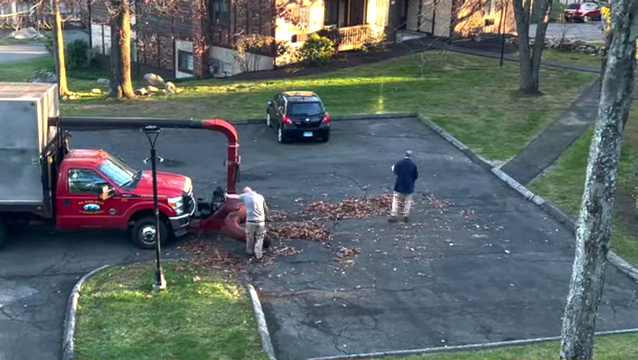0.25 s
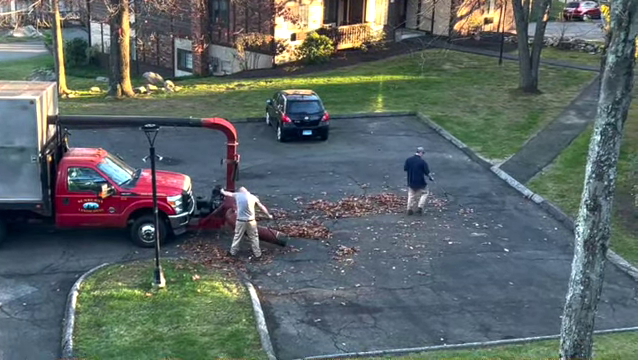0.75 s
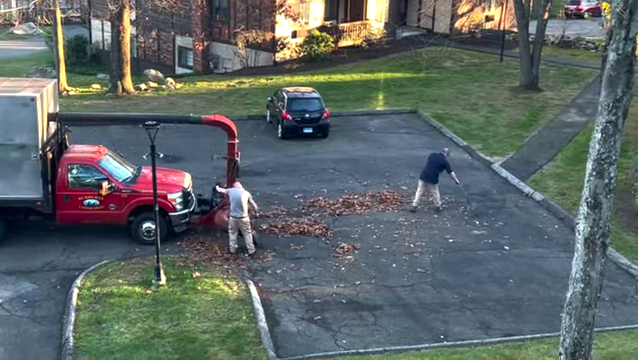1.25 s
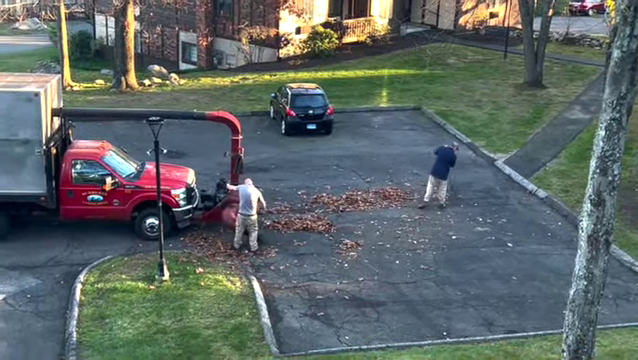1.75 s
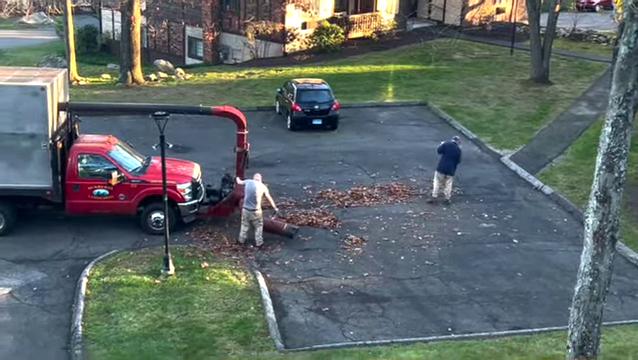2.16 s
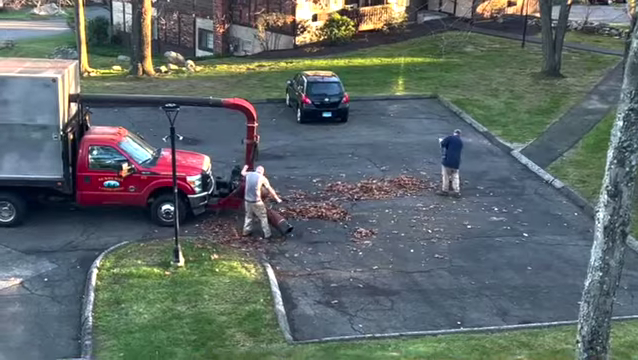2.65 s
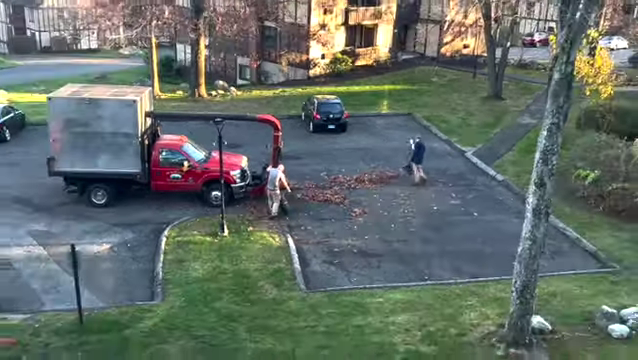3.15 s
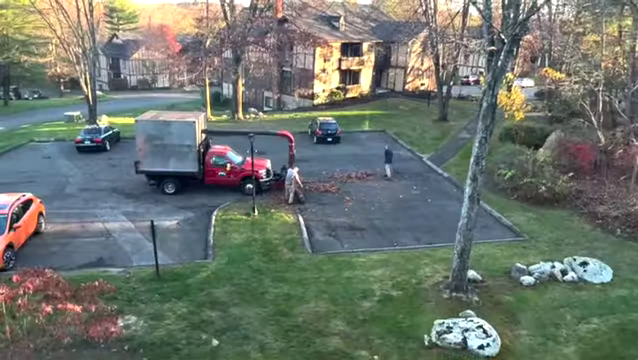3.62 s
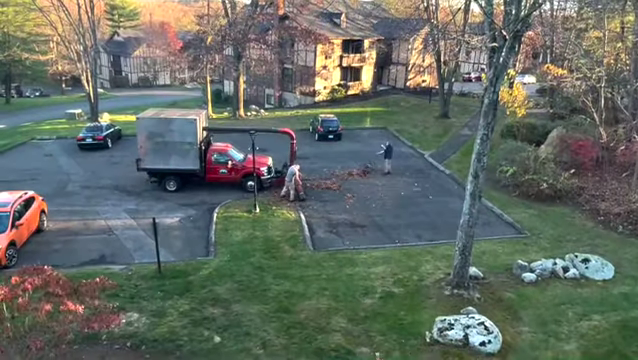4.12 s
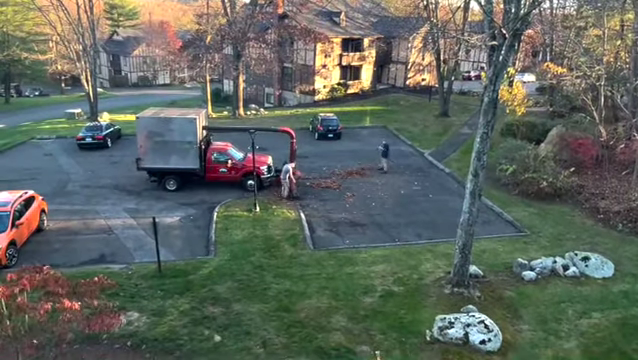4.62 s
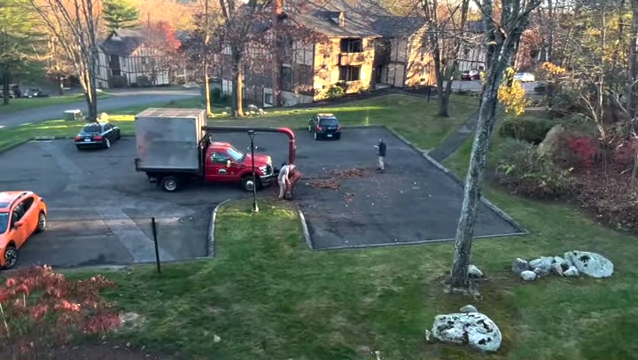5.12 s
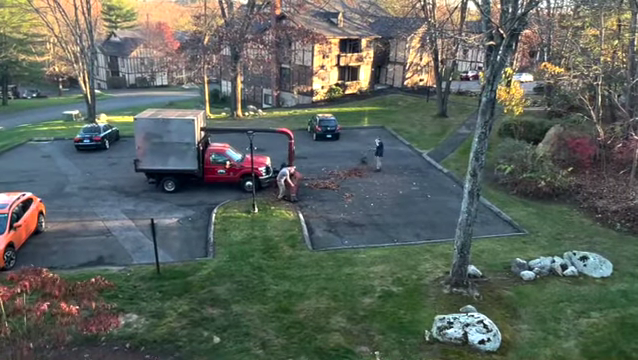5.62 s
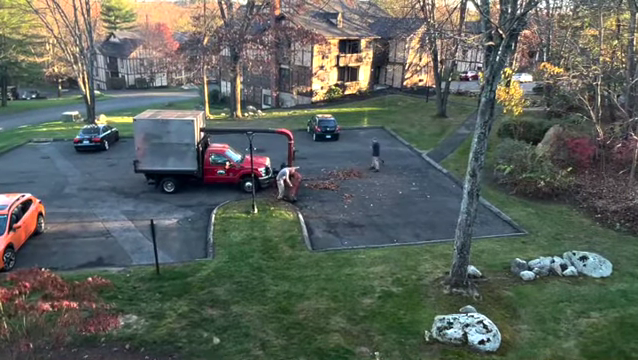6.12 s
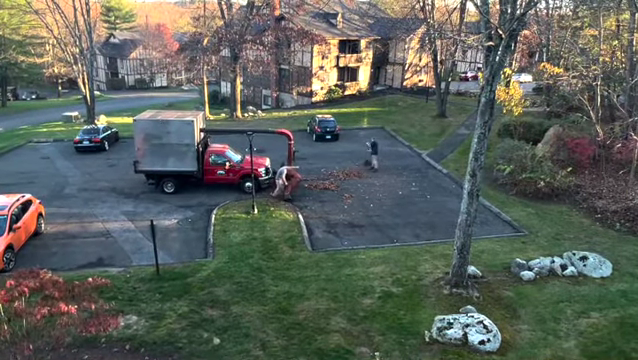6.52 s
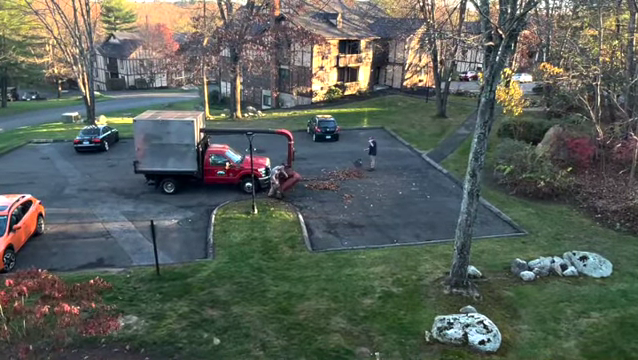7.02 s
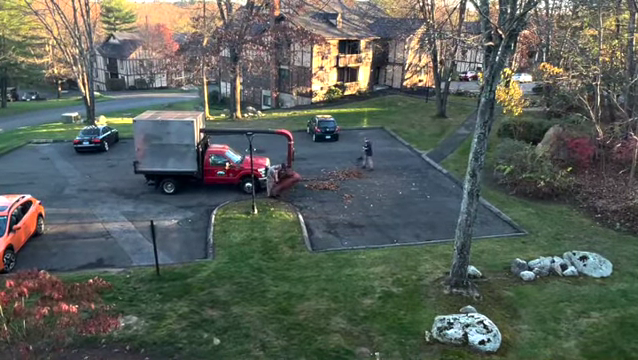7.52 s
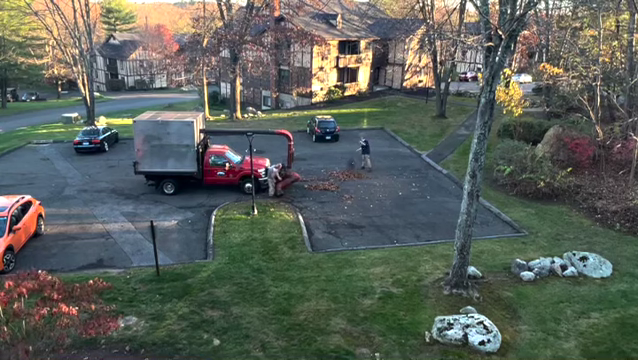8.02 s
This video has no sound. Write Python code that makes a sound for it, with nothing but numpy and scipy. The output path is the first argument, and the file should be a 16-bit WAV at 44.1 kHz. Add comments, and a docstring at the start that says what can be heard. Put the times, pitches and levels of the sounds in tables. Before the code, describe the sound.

A truck-mounted leaf vacuum drones steadily outdoors, its throbbing engine and humming fan under rushing air and the surging hiss of dry leaves.

```python
"""An engine throbs under a fan's hum, a roar of air and a hiss of leaves: a truck-mounted leaf vacuum
working across a car park, heard from an upper floor. Its governed twin-cylinder engine puffs through a
muffler, knocks, rings its covers and turns a four-blade fan. Air resonates in the hose; loads of leaves
tick through it and clumps scrape the housing. The microphone is zoomed in and nearly mono at first,
then opens to wide stereo at about 3.4 s; a few soft booms follow."""
import sys
import numpy as np
from scipy import signal
from scipy.fft import rfft, irfft
from scipy.io import wavfile
from scipy.ndimage import uniform_filter1d, map_coordinates

SR = 44100
rng = np.random.default_rng(int(sys.argv[2]) if len(sys.argv) > 2 else 0)


def wav_out(sig):
    """Save sig, one row per channel (or a flat mono array), as 16-bit PCM at SR to the path in sys.argv[1]."""
    wavfile.write(sys.argv[1], SR, np.round(np.clip(np.atleast_2d(sig).T, -1, 1) * 32767).astype(np.int16))


N = 364707
T = np.arange(N) / SR
HZ = np.maximum(np.arange(N // 2 + 1) * SR / N, 1)
SIDES = np.array([[.5], [-.5]])  # left and right shares of a difference


def undb(db):
    """Decibels to gain."""
    return 10 ** (np.asarray(db) / 20)


def unit(x):
    """Scale to rms 1."""
    return x / np.sqrt(np.mean(x ** 2))


def curve(table):
    """A (time, value) table, sample by sample."""
    return np.interp(T, *np.transpose(table))


def colour(points):
    """Gain per frequency from (Hz, dB) points."""
    hz, db = np.transpose(points)
    return undb(np.interp(np.log(HZ), np.log(hz), db))


def resonances(modes):
    """Gain per frequency of (Hz, width Hz, dB) resonances."""
    return np.sqrt(sum(undb(db) ** 2 / (1 + ((HZ ** 2 - hz ** 2) / (HZ * width_hz)) ** 2)
                       for hz, width_hz, db in modes))


def filtered(x, gain):
    """Apply a gain per frequency."""
    return irfft(rfft(x) * gain, N)


def walk(rate_hz):
    """Smooth, bounded random drift with spread near 1."""
    points = rng.uniform(-2.3, 2.07, size=2048)
    return map_coordinates(points, [T * rate_hz], order=2, mode="wrap")


def hump(at_s, half_s, shape=2, tail=1):
    """A rise to 1 at at_s and a fall tail times as long; shape 1 is pointed, 2 round."""
    return np.exp(-np.abs((T - at_s) / np.where(T < at_s, half_s, half_s * tail)) ** shape)


# cylinder firings: (moment [cycles], strength [ratio])
FIRINGS = [(.104, 0.77), (.712, 0.73)]
# muffler chambers: (centre [Hz], width [Hz])
MUFFLER_MODES = [(56.8, 28.5), (137.5, 8.2), (273, 68)]
# exhaust harmonics: (order [per cycle], relative level [dB])
EXHAUST_LINES = [(2, -38), (3, -31.5), (4, -44.5), (5, -24), (6, -36.5), (7, -27), (9, -34), (10, -29.5),
                 (11, -45), (13, -38.5), (14, -40), (15, -41)]


def exhaust(cycle, openness, stray_db=0.93, gain_db=-0.6, pan_db=-1.2, zoom_tilt_db=1.6):
    """Two unevenly spaced firings a cycle ring the muffler: a throb, brighter while zoomed in."""
    out = 0
    stumble = (.001 + .0008 * openness) * walk(24)  # no firing comes exactly on time
    force = undb(0.65 * walk(40))
    for order, db in EXHAUST_LINES:
        k = round(order)
        hz = k * cycle[-1] / T[-1]
        pair = sum(strength * np.exp(-2j * np.pi * k * at) for at, strength in FIRINGS)
        lag_rad = 2 * sum(np.arctan2(hz * width_hz, centre_hz ** 2 - hz ** 2)
                          for centre_hz, width_hz in MUFFLER_MODES)
        phase = 2 * np.pi * k * (cycle + stumble) + np.angle(pair) - lag_rad
        db = db + zoom_tilt_db * (.5 - openness) / (1 + (200 / hz) ** 8)
        db = db + stray_db * k / 10 * walk(5)  # moving air disturbs high lines most
        out = out - undb(db) * np.cos(phase)
    return np.sqrt(2) * force * out * undb(gain_db + SIDES * pan_db)


# modes rung by the knock: (centre [Hz], width [Hz], relative level [dB])
KNOCK_MODES = [(503, 32, -13), (623, 47, 8.5), (691, 84, 7), (827, 180, -15.5)]


def knock(cycle, at_cycles=0.017, low_cut_hz=350, level_db=-40.8):
    """Once a cycle the engine gives a hard, hollow knock that rings down."""
    since_s = (cycle - at_cycles) % 1 * T[-1] / cycle[-1]
    ring = sum(undb(db) * np.exp(-np.pi * width_hz * since_s) * np.sin(2 * np.pi * hz * since_s)
               for hz, width_hz, db in KNOCK_MODES)
    strength = undb(2.6 * walk(24))
    radiated = filtered(ring * strength, 1 / (1 + (low_cut_hz / HZ) ** 2))  # small panels shed no bass
    return unit(radiated) * undb(level_db)


# cover harmonics: (order [per cycle], relative level zoomed [dB], relative level wide [dB])
COVER_LINES = [(18, -45, -53), (21, -49.5, -50), (30, -58, -49), (34, -47.5, -51), (35, -53, -54),
               (36, -49, -52), (48, -53.5, -56), (49, -58, -56), (51, -55, -57), (55, -58, -60),
               (63, -50.5, -58), (64, -54, -58), (66, -57, -61), (84, -53, -57)]


def covers(cycle, openness, waver_rad_per_khz=0.47, patchy_db=3.0, gain_db=-1):
    """Engine covers resonate in thin, wavering lines; each side hears them by its own path."""
    out = np.zeros((2, N))
    for order, zoomed_db, wide_db in COVER_LINES:
        db = zoomed_db + (wide_db - zoomed_db) * openness
        gain = undb(db + gain_db + patchy_db * walk(11))
        phase = 2 * np.pi * round(order) * cycle
        khz = order * cycle[-1] / T[-1] / 1000
        path_drift = walk(20) + .5 * np.array([walk(11), walk(9)])
        out += gain * np.cos(phase + waver_rad_per_khz * khz * path_drift)
    return np.sqrt(2) * out


# turbulent exhaust gas: (frequency [Hz], relative density [dB])
GAS_SPECTRUM = [(40, -18.5), (80, -7), (112, 0), (130, -6.5), (155, -1.5), (180, -2), (205, 4), (228, -5.5),
                (255, -6), (335, -1.5), (395, -7.5), (425, -13), (520, -22.5), (900, -24), (1500, -58.5)]
# low rumble: (frequency [Hz], relative density [dB])
RUMBLE_SPECTRUM = [(20, -24), (32, -25.5), (55, 8), (85, 9.5), (115, 3.5), (150, -8.5), (300, -34.5)]


def gas(cycle, decay_cycles=0.3, steady_flow=1.2, puff_db=-27, rumble_db=-34.5):
    """Each firing blows a turbulent puff out of the muffler, over a steady low rumble."""
    flow = steady_flow + sum(strength * np.exp(-((cycle - at) % 1) / decay_cycles)
                             for at, strength in FIRINGS)
    rumble = unit(filtered(rng.standard_normal(N), colour(RUMBLE_SPECTRUM)))
    puffs = unit(filtered(flow * rng.standard_normal(N), colour(GAS_SPECTRUM)))
    return undb(puff_db) * puffs + undb(rumble_db) * rumble


# blade harmonics 1-4: (relative level [dB])
BLADE_DB = [-26, -28.5, -43, -38.5]
# their places in wide stereo: (left minus right [dB], left lead [rad])
BLADE_PLACES = [(-8, -1.17), (3, -0.42), (-5.5, -0.17), (-1, 0.94)]
# swells and fades as the hose is swung: (time [s], harmonic [number], change [dB], half length [s])
BLADE_SWELLS = [(0.0, 1, -18, 0.29), (0.556, 1, 3, 0.094), (0.88, 1, 10, 0.39), (2.41, 1, 10.7, 0.42),
                (2.98, 1, 4, 0.2), (3.652, 1, 3.5, 0.22), (8.15, 1, 3.5, .2), (0.285, 2, -14.5, 0.17),
                (0.684, 2, -12, 0.093), (0.994, 2, -6, 0.061), (1.466, 2, -1.5, .15), (2.198, 2, 5, 0.64),
                (3.59, 2, -9.5, 0.13), (4, 2, 2.5, 0.21), (4.79, 2, -4.5, 0.12), (6.375, 2, -3, .17),
                (7.34, 2, -13, 0.1), (0.42, 3, 2, 0.11), (1.152, 3, 3.5, .25), (2.123, 3, 6, 0.1),
                (2.55, 3, 3, 0.3), (3.298, 3, 9, 0.16), (3.85, 3, 6.5, 0.071), (4.831, 3, 12, 0.05),
                (5.5, 3, -19, 0.35), (7.05, 3, 12, 0.12), (7.293, 3, 8, 0.08), (7.648, 3, -12, 0.25),
                (0.448, 4, 5, 0.25), (1.576, 4, -14, 0.15), (2.08, 4, 6.5, 0.13), (2.72, 4, 5.5, 0.14),
                (3.2, 4, -11, 0.26), (3.693, 4, 4.5, 0.21), (4.417, 4, -5, 0.2), (4.98, 4, 6.5, 0.06),
                (5.743, 4, -6, 0.48), (6.476, 4, 6.5, 0.05), (7.526, 4, 3, 0.17)]


def fan(cycle, openness, lag_cycles=0.1156, zoomed_width=0.31, waver_rad=0.09, flutter_db=0.42):
    """Four blades pass the outlet twice a cycle; uneven inflow makes the overtones flutter."""
    out = 0
    width = zoomed_width + (1 - zoomed_width) * openness
    for k, (db, (pan_db, lead_rad)) in enumerate(zip(BLADE_DB, BLADE_PLACES), 1):
        db = db + sum(change_db * hump(at_s, half_s)
                      for at_s, harmonic, change_db, half_s in BLADE_SWELLS if round(harmonic) == k)
        db = db + k * flutter_db * walk(16) + SIDES * width * pan_db
        phase = 2 * np.pi * k * 8 * (cycle - lag_cycles)
        phase = phase + k * waver_rad * walk(16) + SIDES * width * lead_rad
        out = out - undb(db - 1) * np.cos(phase)  # each blade leaves a dip in pressure
    return np.sqrt(2) * out


# hose and housing resonances, before sharpening: (centre [Hz], width [Hz], relative level [dB])
HOSE_MODES = [(452, 73, -4), (592.5, 71, -0.5), (737, 58, -2), (875, 44, -3)]
# hollow roar: (time [s], level [dB])
ROAR_LEVELS = [(0, -34), (.35, -34), (.85, -34.5), (1.6, -38.5), (2.2, -35), (2.9, -38), (3.8, -35.5),
               (4.8, -33.5), (5.5, -38), (6.28, -32.5), (6.52, -33), (6.72, -42.5), (7.07, -33),
               (7.4, -39.5), (8.27, -37.5)]


def hose(cycle, chop=0.23, sharpen=1.7, flex=.012, swell_db=0.36):
    """Air chopped by the blades roars in the hose, whose resonances shift as it flexes."""
    chopped = (1 + chop * np.cos(2 * np.pi * 8 * cycle)) * rng.standard_normal(N)
    roar = filtered(chopped, resonances(HOSE_MODES) ** sharpen)
    flexed = map_coordinates(roar, [np.cumsum(1 + flex * walk(3))], order=1, mode="mirror")
    return unit(flexed) * undb(curve(ROAR_LEVELS) + swell_db * walk(4.6))


# air leaving the chute: (frequency [Hz], relative density [dB])
RUSH_SPECTRUM = [(200, -4.5), (520, -3), (680, 5), (900, 6.5), (1050, 0), (1180, 4.5), (1260, 0),
                 (1500, 3.5), (1750, -3), (2150, 0.5), (2900, -20), (4500, -15), (9000, -55.5)]


def chute(rise_db, openness, base_db=-38, follow=0.41, wide_db=1.16):
    """Air rushes out of the chute, louder with each load of leaves."""
    rush = unit(filtered(rng.standard_normal(N), colour(RUSH_SPECTRUM)))
    return rush * undb(base_db + follow * rise_db + wide_db * openness)


# loads of leaves: (time [s], hiss rise [dB], half length [s], added brightness [dB])
LEAF_LOADS = [(0.054, 6.5, 0.15, 4), (0.5, 2, 0.032, -3), (0.642, 3.5, 0.41, 1.5), (0.8, 2.5, .04, -1),
              (1.015, 4.5, 0.031, -2.5), (1.13, 1, .035, 3), (1.322, 3, .08, 5), (1.607, 6.5, 0.2, 1),
              (1.892, 2.5, .04, 9), (2.825, 4.8, 0.2, 2.5), (3.06, 4.5, 0.052, 3.5), (3.218, 5.5, 0.036, 4),
              (3.63, 1.5, .03, -4), (4.02, 6, 0.2, 7), (4.786, 3.5, .04, 2), (5.044, 4.5, 0.17, 0.5),
              (5.336, 8.5, 0.14, -0.5), (5.852, 6.5, 0.21, -5), (6.052, 5.5, 0.027, -5.5),
              (6.42, 2.5, .1, 0), (6.535, 3, .015, -2.5), (6.808, 8, 0.23, -1.5), (7.152, 4, 0.46, 2),
              (7.972, 8.2, 0.2, 2), (8.246, 5, 0.036, -1)]


def feed(cycle, base_bright_db=-1.5, throb_db=0.5):
    """Loads sucked up the hose lift and colour the hiss; it flickers with clumps and each fan turn."""
    rise_db, bright_db = 0, base_bright_db
    for at_s, db, half_s, added_db in LEAF_LOADS:
        passing = hump(at_s, half_s, shape=1.15, tail=0.67)
        rise_db = rise_db + db * passing
        bright_db = bright_db + added_db * passing
    clumps_db = walk(45)
    clumps_db = clumps_db - uniform_filter1d(clumps_db, size=SR // 14)  # only the quick changes
    flicker_db = clumps_db + throb_db * np.cos(2 * np.pi * 2 * cycle)
    return rise_db, flicker_db, bright_db


# dry leaves in fan and duct: (frequency [Hz], relative density [dB])
LEAF_SPECTRUM = [(800, -10.5), (1800, -0.5), (2700, 2), (3600, -0.5), (4500, 0.5), (5200, -1.5),
                 (5700, -1.5), (6600, -5), (7200, -7.5), (8900, -8.5), (9600, -20)]


def leaves(lift_db, bright_db, ticks_per_s=3000, scatter_db=3.5, noise_ratio=1.8, base_db=-42):
    """Dry leaves tick against impeller and duct, so densely that they merge into a hiss."""
    tilt_db = bright_db + 2.0 * walk(20)
    hits = rng.random(N) < ticks_per_s / SR
    size_db = scatter_db * np.minimum(rng.exponential(size=N), np.pi)
    ticks = hits * rng.uniform(-1.27, 1, N) * undb(size_db)
    hiss = unit(filtered(unit(ticks) + noise_ratio * rng.standard_normal(N), colour(LEAF_SPECTRUM)))
    crisp = filtered(hiss, 1 / (1 + (5200 / HZ) ** 6))  # small dry scraps make the top octave
    tilted = (hiss - crisp) * undb(-.25 * tilt_db) + crisp * undb(.5 * tilt_db)
    return tilted * undb(base_db + lift_db)


# scraping clumps: (time [s], level [dB], half length [s], centre [Hz])
RASPS = [(1.58, -46, .08, 2050), (5.07, -44, 0.16, 2130), (6.6, -44.5, 0.13, 2050),
         (6.973, -37, 0.082, 2090), (8.224, -44, .05, 2150)]


def rasps(cycle, width_hz=420, sharpen=1.4, chop=0.38, grit_db=3.5):
    """Clumps of leaves scrape round the fan housing, once a turn, and make it ring."""
    scrape = (1 + chop * np.cos(2 * np.pi * 2 * cycle)) * undb(grit_db * walk(70))
    out = 0
    for at_s, db, half_s, hz in RASPS:
        ring = filtered(scrape * rng.standard_normal(N), resonances([(hz, width_hz, 0)]) ** sharpen)
        out = out + unit(ring) * undb(db) * hump(at_s, half_s)
    return out


# low booms: (time [s], level [dB], half length [s], centre [Hz])
BOOMS = [(3.927, -29, 0.12, 66.6), (4.375, -28.5, 0.21, 87), (4.745, -25.5, 0.11, 106),
         (6.78, -31, 0.15, 114)]


def booms(width_hz=48, sharpen=2):
    """Soft swells of low rumble."""
    out = 0
    for at_s, db, half_s, hz in BOOMS:
        rumble = filtered(rng.standard_normal(N), resonances([(hz, width_hz, 0)]) ** sharpen)
        out = out + unit(rumble) * undb(db) * hump(at_s, half_s)
    return out


def spread(mid, side, width_points):
    """Share the power between what both sides have in common and what differs."""
    width = colour(width_points)
    norm = 1 / np.sqrt(1 + width ** 2)
    return filtered(mid, norm) + 2 * SIDES * filtered(side, width * norm)


# stereo width, zoomed in: nearly mono, with a faint wide hiss above 9 kHz:
# (frequency [Hz], side minus mid [dB])
SIDE_ZOOMED = [(60, -15), (200, -11.5), (900, -12.5), (1800, -16), (3000, -27), (5000, -40), (8800, -39.5),
               (9300, 8)]
# microphone response, zoomed in: (frequency [Hz], gain [dB])
RESPONSE_ZOOMED = [(100, -1), (190, 0), (250, 0.5), (320, 0), (520, 3.5), (800, 0.5), (1500, 0.5),
                   (1800, -0.5), (2150, -4), (2650, 2.5), (2900, 0), (3600, 0), (5000, -3), (7200, 1.5),
                   (9000, 1.5)]
# stereo width, wide: diffuse sound off trees and houses: (frequency [Hz], side minus mid [dB])
SIDE_WIDE = [(60, -32), (120, -8.5), (300, -13), (600, -4.5), (950, -4), (1450, -1.5), (2100, -1.5),
             (2900, -3.5), (4200, -2.5), (5300, -3), (6400, -6), (7300, -8.5), (8800, -16.5)]
# phase between the sides, wide: (frequency [Hz], left lead [rad])
LEAD_WIDE = [(350, -0.14), (750, 0.4), (1350, 0.15), (1550, 2), (2250, 1), (2650, 3), (4200, 2.5),
             (5400, 3.4), (6450, 1.2), (7100, 2.5), (8000, 5), (8500, 0.5), (9000, 2.5), (9500, -10)]
# balance, wide: (frequency [Hz], left minus right [dB])
BALANCE_WIDE = [(100, -4), (350, 2.5), (650, -6), (1100, 0.5), (1550, -3), (2100, -5), (3000, 0.5),
                (6000, 3.5), (7500, 0)]


def microphone(mid, side, openness):
    """The zoom crossfades the machine's noise from nearly mono to wide stereo."""
    zoomed = filtered(spread(mid, side, SIDE_ZOOMED), colour(RESPONSE_ZOOMED))
    lead_rad = np.interp(HZ, *np.transpose(LEAD_WIDE))
    placement = colour(BALANCE_WIDE) ** SIDES * np.exp(1j * SIDES * lead_rad)
    wide = filtered(spread(mid, side, SIDE_WIDE), placement)
    return (1 - openness) * zoomed + openness * wide


# governed crankshaft: (time [s], speed [turns/s])
CRANK_SPEED = [(0, 47.86), (.6, 48.02), (1.4, 47.94), (2.1, 48.02), (3.0, 48.01), (3.6, 48.12),
               (4.4, 47.96), (5.3, 48.06), (6.2, 47.91), (7.3, 48.0), (7.8, 47.88), (8.27, 48.08)]
# microphone zoom: (time [s], openness [0 zoomed in, 1 wide])
ZOOM = [(0, 0), (3.3, 0), (3.48, 1), (8.27, 0.9)]


def scene():
    """Tones come straight from the machine; its noise is drawn twice, as mid and side, for width."""
    cycle = np.cumsum(curve(CRANK_SPEED)) / SR / 2  # a four-stroke cycle takes two turns
    openness = curve(ZOOM)
    rise_db, flicker_db, bright_db = feed(cycle)
    mid, side = (gas(cycle) + hose(cycle) + chute(rise_db, openness)
                 + leaves(rise_db + flicker_db, bright_db) + rasps(cycle) for _ in range(2))
    engine = exhaust(cycle, openness) + knock(cycle) + covers(cycle, openness)
    return engine + fan(cycle, openness) + microphone(mid, side, openness) + booms()


def record(dry, top_hz=9600):
    """A steep low-pass cuts the top."""
    return signal.sosfilt(signal.ellip(8, .2, 70, top_hz, fs=SR, output="sos"), dry)


dry = scene()
out = record(dry)
wav_out(out)
```